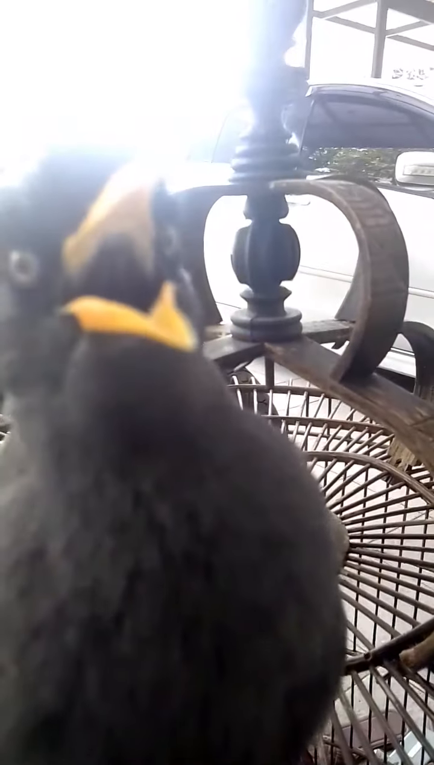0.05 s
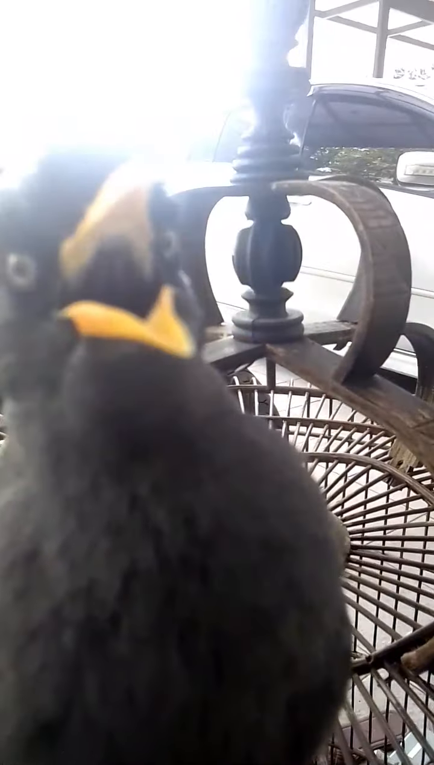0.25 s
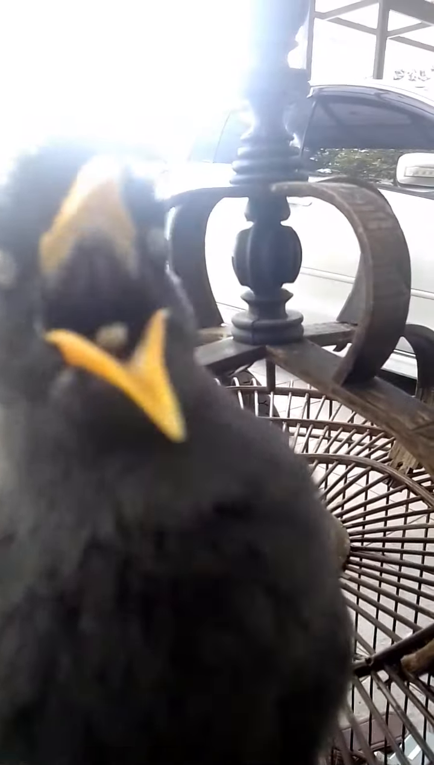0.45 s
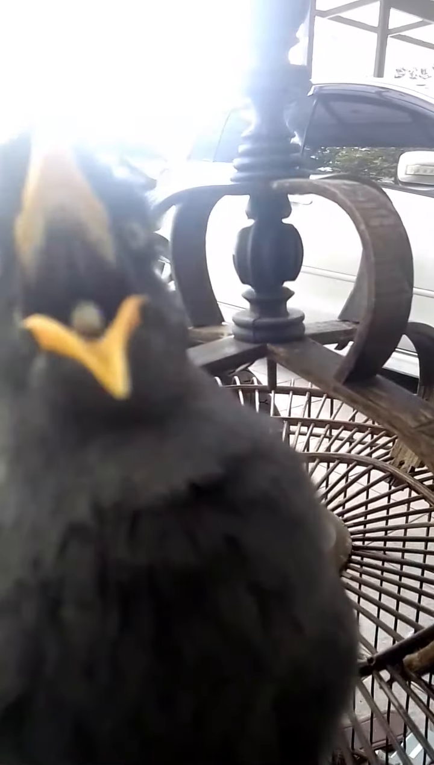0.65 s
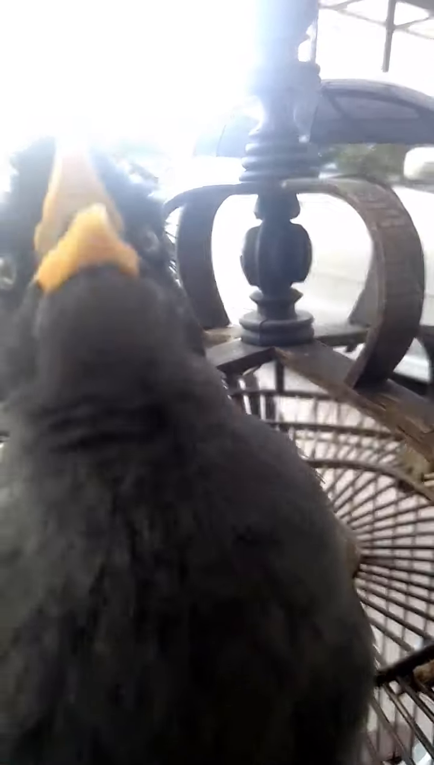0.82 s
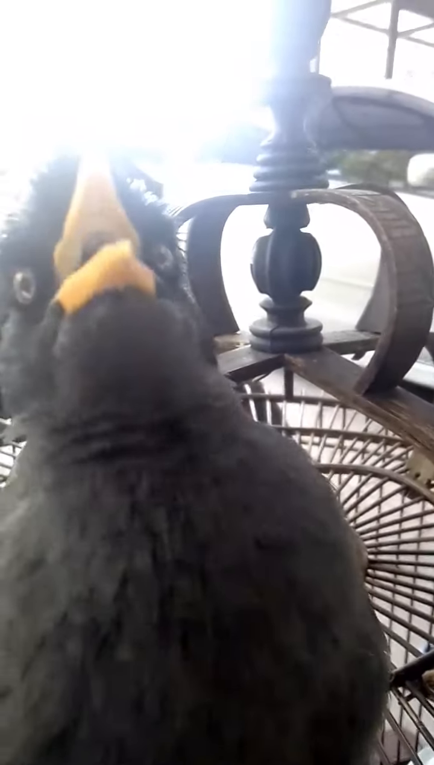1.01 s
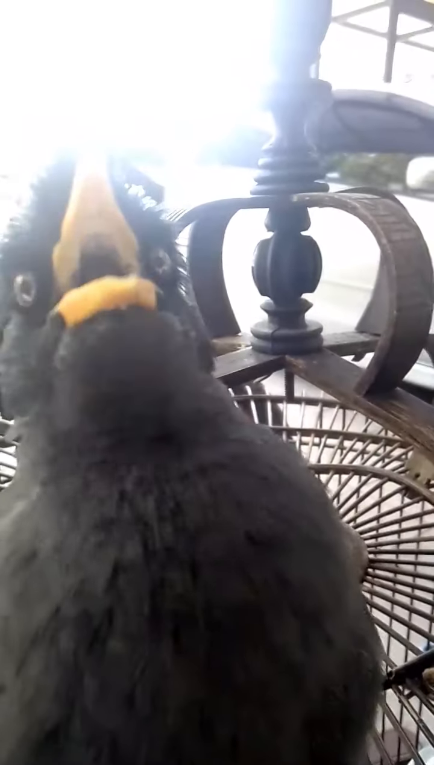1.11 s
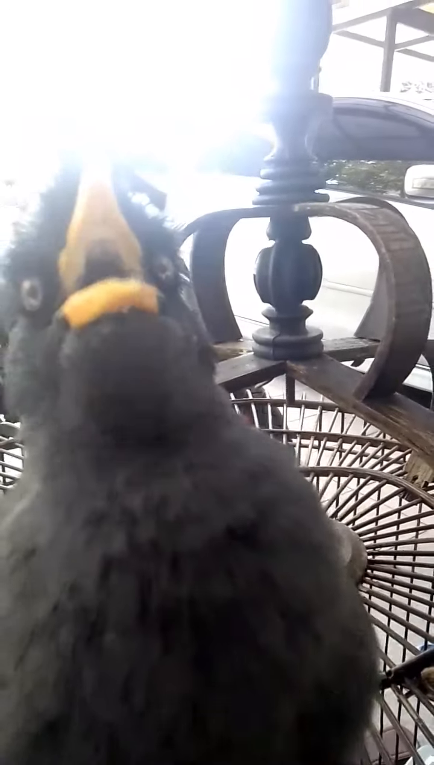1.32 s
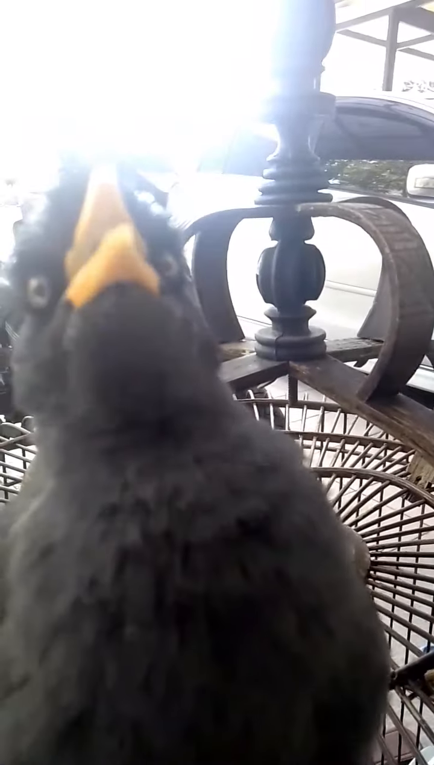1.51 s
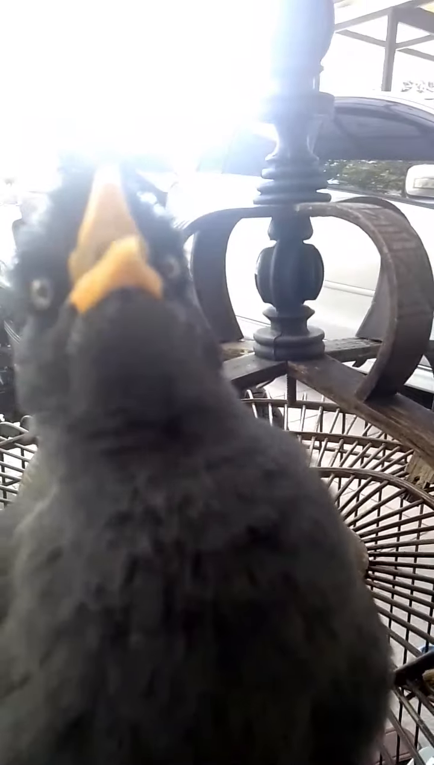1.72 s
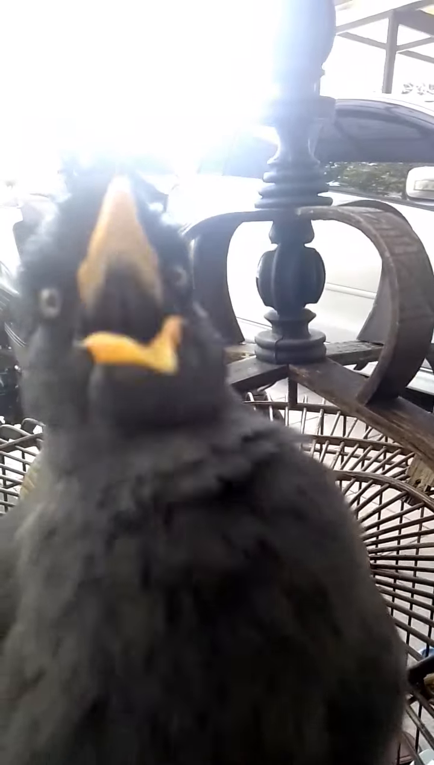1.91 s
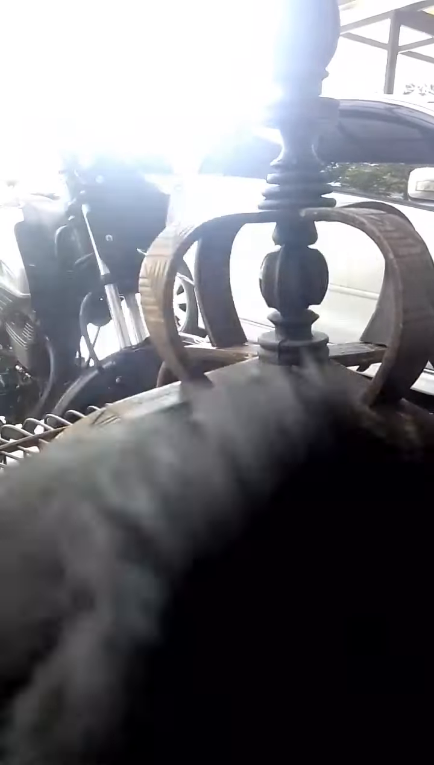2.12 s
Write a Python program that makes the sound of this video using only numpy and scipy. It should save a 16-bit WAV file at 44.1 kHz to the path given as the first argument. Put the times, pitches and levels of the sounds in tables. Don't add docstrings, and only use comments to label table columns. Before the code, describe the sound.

A myna bird calls close to a phone microphone in an open shelter. A soft twitter and two sharp chips come by 0.3 seconds, an arched whistle at 0.4, then a long swoop from 0.7 dips low and trills upward until 1.2. After a pause, harsh chucks sound at 1.4, 1.55 and softly 1.7, with a quick rising whistle. Three hard bill snaps follow around 2.0. Brief echo, faint outdoor hum.

```python
import sys
import numpy as np
from scipy import signal
from scipy.io import wavfile
from scipy.ndimage import uniform_filter1d, minimum_filter1d

SR = 44100
rng = np.random.default_rng(int(sys.argv[2]) if len(sys.argv) > 2 else 0)


def field_ratio(decibels):
    return 10 ** (np.asarray(decibels, dtype=float) / 20)


def dump_mix(stems):
    frames = np.atleast_2d(stems).T
    limited = np.clip(frames, -1, 1)
    pcm = np.round(limited * 32767).astype(np.int16)
    wavfile.write(sys.argv[1], SR, pcm)


N = 94815

# time_s, pitch_hz, level_db, second_partial_db
TWITTER = [
    (0, 4640, -42, -68),
    (.058, 3735, -31.5, -65),
    (.07, 4037, -33, -66.5),
    (.138, 3930, -42, -64),
    (.172, 5405, -30.5, -83.5),
]
CHIP_A = [
    (0.185, 5370, -45.5, -73),
    (0.199, 4370, -37.5, -61),
    (.206, 3550, -12, -50),
    (0.228, 3394, -20.5, -64.5),
    (0.237, 3408, -28.5, -57),
]
CHIP_B = [
    (.285, 5230, -39, -68.5),
    (.296, 4400, -40.5, -64),
    (.305, 3773, -10, -47),
    (0.322, 3482, -26, -70),
]
ARCH = [
    (0.43, 2840, -32.5, -34),
    (0.439, 3900, -11.5, -43),
    (.45, 3950, -1.5, -37.5),
    (0.466, 4370, -13.5, -46.5),
    (0.502, 4645, -22.5, -47.5),
    (0.518, 4788, -24, -47.5),
    (0.545, 4514, -18.5, -50.5),
    (0.566, 4210, -15, -46),
    (.589, 3935, -22, -54.5),
]
SWOOP = [
    (0.687, 3100, -39, -59),
    (.699, 3780, -10.5, -45),
    (.722, 4300, -12.5, -39),
    (.742, 4590, -13.5, -46),
    (.762, 4640, -17, -44),
    (0.791, 4350, -12, -43),
    (0.815, 3820, -6.5, -42),
    (0.829, 3500, -18, -48.5),
    (.85, 2930, -19, -36.5),
]
TROUGH = [(.872, 2560, -18, -39), (.895, 2220, -12, -36), (.925, 2070, -10, -34), (.966, 1980, -8, -33),
          (.98, 1860, -15, -35)]
TRILL = [(.994, 1950, -4, -27), (1.03, 2080, -10, -33), (1.06, 2560, -12, -34), (1.09, 2980, -12, -35),
         (1.12, 3290, -12, -35), (1.15, 3440, -10, -35), (1.17, 3330, -8, -35), (1.192, 3330, -9, -42)]
RISE = [
    (1.706, 1080, -16, -21),
    (1.726, 1500, -38, -30),
    (1.75, 1780, -32, -28),
    (1.761, 2030, -13, -43),
    (1.779, 2610, -21, -42),
    (1.79, 2570, -23, -42),
    (1.799, 2800, -15, -42),
    (1.83, 2892, -10, -42),
    (1.846, 2860, -22, -54),
]
NOTES = [TWITTER, CHIP_A, CHIP_B, ARCH, SWOOP + TROUGH + TRILL, RISE]
ATTACK_S, RELEASE_S = .003, .004
THIRD_DB, FOURTH_DB, RISE_UPPER_DB = -6, -17, -17
TROUGH_PARTIALS_DB = 6

# time_s, rate_hz, swing_hz
FLUTTER = [(.13, 125, 280), (.155, 125, 15), (.83, 125, 25), (.86, 125, 210), (.92, 120, 200),
           (.96, 75, 130), (1.0, 70, 10)]
FLUTTER_DB_PER_KHZ, WAVER_DB, WAVER_HZ = -2, 2, 23.2
RASP_DB, RASP_HZ, BREATH_DB = -27, 5000, -44
# time_s, level_db
RASP = [(0, -10), (.14, -5), (.2, -11), (.6, -18.5), (.69, 2.5), (.83, -15), (.92, -1), (1.0, 7.5),
        (1.14, 7), (1.19, -17), (1.72, 18.5), (1.8, -15)]
# time_s, level_db
BREATH = [(.4, -13.5), (.6, -7.5), (.69, 16.5), (.76, 20), (.83, 8.5), (.92, 1), (1.0, 0.5), (1.14, -8),
          (1.19, -12), (1.72, 2), (1.8, -2.5)]
# centre_s, length_s, depth_db
BREAKS = [(.933, .004, -18), (.95, .005, -16), (.9585, .004, -16), (.983, .007, -16), (1.012, .017, -32),
          (1.029, .005, -7), (1.043, .01, -9), (1.057, .006, -8), (1.104, .014, -5), (1.138, .01, -5)]
# pitch_hz, level_db
UPPER_TRACT = [
    (4500, -13.5),
    (5600, -3.5),
    (9000, -20),
    (12500, 3.5),
]
WINDPIPE_HZ = 1680

# crest_s, crest_hz, following_trough_hz
TRILL_TURNS = [(.995, 1960, 1380), (1.0275, 2420, 1750), (1.0575, 3300, 2140), (1.0885, 3800, 2450),
               (1.12, 4150, 2700), (1.152, 4150, 3070), (1.185, 3600, 3250), (1.215, 3600, 3250)]
TRILL_FALL_SHARE, TRILL_LEAP = .52, 2.0

# start_s, level_db
BLIPS = [
    (0.418, -18.5),
    (0.676, -18.5),
]
BLIP_S, BLIP_FROM_HZ, BLIP_TO_HZ, BLIP_SECOND_DB = 0.012, 1677, 2597, -2.5

# start_s, attack_s, hold_s, level_db, brightness_db
CHUCKS = [
    (1.388, 0.0025, 0.0077, -7.5, -1.5),
    (1.539, 0.0015, 0.012, -8.5, -3.5),
    (1.675, 0.021, 0.01, -19.5, -6),
    (1.695, 0.0074, 0.06, -32.5, -5),
]
CHUCK_RATE_HZ, CHUCK_SCATTER_DB, CHUCK_FALL_DB_S, CHUCK_AIR_DB = 3400, 1.5, 1504, -22.5
FIRST_SLAP_DB, FIRST_SLAP_S = 4, .003
# pitch_hz, width_hz, level_db
THROAT = [(1813, 60, -1), (2190, 172, -1), (3020, 160, -2), (3449, 130, 1), (3960, 80, 0), (5040, 536, -15)]
# pitch_hz, width_hz, level_db
CROP = [(654, 54, -33.5), (854, 204, -26), (1217, 334, -17), (1500, 166, -14)]
THROAT_STRETCH = [1.004, 0.971, 0.962, .93]

# start_s, level_db
SNAPS = [
    (1.9753, -1),
    (1.9984, 0),
    (2.0315, 2.5),
]
# pitch_hz, width_hz, level_db
BILL = [(2306, 440, -3.5), (3695, 165, 2.5), (5030, 620, -4), (7130, 530, -16), (8500, 150, -48.5),
        (9440, 148, -28), (11700, 220, -28.5)]
SNAP_DB, SNAP_EDGE_DB, TOUCH_DB, TOUCH_LEAD_S = -2.5, -5, -24, .0015

# start_s, length_s, level_db, centre_hz, width_hz
PUFFS = [(0.18, 0.017, -47, 2440, 2280), (0.42, 0.0058, -38, 4340, 5960), (0.649, 0.068, -36, 3190, 2330),
         (0.654, 0.042, -50, 8000, 8700), (1.151, 0.0027, -26.5, 11000, 2930),
         (1.173, 0.002, -19, 9800, 1500), (1.1774, 0.003, -34.5, 10170, 1500),
         (.676, 0.025, -29.5, 4480, 3930), (1.372, 0.0045, -39.5, 2030, 482),
         (1.395, 0.0006, -29.5, 8900, 12100)]
# start_s, level_db
POPS = [
    (1.394, -39),
    (1.975, -43),
    (1.996, -45),
    (2.03, -48),
]
POP_S = .004

# delay_s, level_db
ECHOES = [(.0007, -13), (.0024, -17), (.0054, -17), (.0118, -22), (.0205, -29)]
NEAR_DB, NEAR_T60_S = -14, 0.079
FAR_DB, FAR_T60_S, FAR_LOW_HZ, FAR_TOP_HZ = -18.5, 0.45, 1850, 5470

# pitch_hz, level_db
HUM = [(30, -5.5), (70, -21.5), (200, -5), (500, -7.5), (1100, -12), (2600, -16.5), (4300, -35.5),
       (14000, -27)]
HUM_DB, HUM_LINE_HZ, HUM_LINE_DB = -54.5, 876.5, -59
RUMBLE_HZ, RUMBLE_DB = 50, -77
MIC_LOW_HZ, MIC_TOP_HZ, TOP_HZ, CEILING = 40, 11900, 15900, 0.7


def unit(x):
    return x / np.sqrt(np.mean(x ** 2) + 1e-18)


def ring(x, hz, width):
    return signal.lfilter(*signal.iirpeak(hz, hz / max(width, 30.), fs=SR), x)


def noise():
    return rng.standard_normal(N)


def walk(rate):
    k = int(SR / rate)
    return unit(uniform_filter1d(uniform_filter1d(noise(), k), k))


def curve(table, t, axis=1):
    rows = np.array(table, float)
    return np.interp(t, rows[:, 0], rows[:, axis])


def whistles(t):
    rows = sorted(sum((list(note) for note in NOTES), []))
    gate = 0
    for note in NOTES:
        start, end = note[0][0], note[-1][0]
        gate = gate + np.interp(t, [start - ATTACK_S, start, end, end + RELEASE_S], [0, 1, 1, 0]) ** 2

    flutter_rate = curve(FLUTTER, t) * (1 + 0.043 * walk(49))
    swing = curve(FLUTTER, t, axis=2) * field_ratio(1.7 * walk(130))
    flutter = swing * np.sin(2 * np.pi * np.cumsum(flutter_rate) / SR)
    trill_hz, height = trill(t)
    trilling = (t > TRILL_TURNS[0][0]) & (t < TRILL_TURNS[-1][0])
    glide_hz = uniform_filter1d(curve(rows, t), size=260)
    hz = np.where(trilling, trill_hz, glide_hz) + flutter + WAVER_HZ * walk(150)
    phase = 2 * np.pi * np.cumsum(hz) / SR

    break_db = sum(db * np.exp(-(2 * (t - s) / span) ** 2) for s, span, db in BREAKS)
    first = field_ratio(curve(rows, t, axis=2) + break_db)
    second_db = curve(rows, t, axis=3) + 0.56 * walk(160)
    second = field_ratio(second_db - TROUGH_PARTIALS_DB * height * trilling)
    rise_db = RISE_UPPER_DB * (t > RISE[0][0] - ATTACK_S)

    def upper_gain(k):
        return np.clip((TOP_HZ - k * hz) / 2000, 0, 1) * field_ratio(curve(UPPER_TRACT, k * hz) + rise_db)

    rasp = field_ratio(RASP_DB + curve(RASP, t)) * walk(RASP_HZ)
    partials = np.sin(2 * phase)
    partials = partials + field_ratio(THIRD_DB) * upper_gain(3.07) * np.sin(3 * phase)
    partials = partials + field_ratio(FOURTH_DB) * upper_gain(4) * np.sin(4 * phase)
    tone = first * (1 + rasp) * np.sin(phase) + second * partials
    breath = field_ratio(BREATH_DB + curve(BREATH, t)) * first * unit(ring(noise(), 3600, 5500))
    waver = field_ratio(WAVER_DB * walk(110) + FLUTTER_DB_PER_KHZ * flutter / 1000)
    voice = gate * waver * (np.sqrt(2) * tone + breath)
    return signal.sosfilt(signal.butter(6, WINDPIPE_HZ, "high", fs=SR, output="sos"), voice)


def trill(t):
    s, crest, trough = np.array(TRILL_TURNS).T
    turn = np.interp(t, s, np.arange(len(s)))
    k = np.minimum(turn.astype(int), len(s) - 2)
    u = turn - k
    fall = np.clip(u / TRILL_FALL_SHARE, 0, 1)
    leap = np.clip((u - TRILL_FALL_SHARE) / (1 - TRILL_FALL_SHARE), 0, 1) ** TRILL_LEAP
    down = .5 + .5 * np.cos(np.pi * fall)
    up = .5 - .5 * np.cos(np.pi * leap)
    hz = trough[k] + (crest[k] - trough[k]) * down + (crest[k + 1] - trough[k]) * up
    return hz, 2 * (down + up) - 1


def blips(t):
    out = 0
    for s, db in BLIPS:
        u = np.clip((t - s) / BLIP_S, 0, 1)
        phase = 2 * np.pi * BLIP_S * (BLIP_FROM_HZ * u + (BLIP_TO_HZ - BLIP_FROM_HZ) * u ** 2 / 2)
        octave = np.sin(2 * phase) + 0.064 * np.sin(3 * phase)
        out = out + field_ratio(db) * np.sin(np.pi * u ** 1.12) * (np.sin(phase) + field_ratio(BLIP_SECOND_DB) * octave)
    return out


def chucks(t):
    out = 0
    for (s, attack, hold, db, air_db), stretch in zip(CHUCKS, THROAT_STRETCH):
        struck = rng.random(N) < CHUCK_RATE_HZ / SR
        slaps = struck * noise() * field_ratio(CHUCK_SCATTER_DB * walk(450))
        low = 0
        for hz, width, gain_db in list(THROAT) + list(CROP):
            once = ring(slaps, hz * stretch, 3.35 * width)
            low = low + field_ratio(gain_db) * ring(once, hz * stretch, 2.0 * width)
        air = unit(ring(slaps + 0.09 * noise(), 7500, 6200))
        after = np.clip(t - s - attack, 0, 1)
        punch_db = FIRST_SLAP_DB * np.exp(-after / FIRST_SLAP_S)
        fall_db = CHUCK_FALL_DB_S * np.clip(after - hold, 0, 1)
        shape = np.clip((t - s) / attack, 0, 1) ** 2 * field_ratio(punch_db - fall_db)
        out = out + field_ratio(db) * shape * (unit(low) + field_ratio(CHUCK_AIR_DB + air_db) * air)
    return out


def snaps():
    kick = np.eye(1, 900)[0]
    out = np.zeros(N)
    for s, db in SNAPS:
        detune = 1 + 0.054 * rng.standard_normal()
        body = 0
        for k, (hz, width, gain_db) in enumerate(BILL):
            body = body + (-1) ** k * field_ratio(gain_db) * ring(kick, hz * detune, width)
        body = body / abs(body).max() + field_ratio(SNAP_EDGE_DB) * ring(kick, 4200, 16000)
        i = int(s * SR)
        touch = i - int(TOUCH_LEAD_S * SR)
        out[i:i + 900] += field_ratio(db + SNAP_DB) * body
        out[touch:touch + 900] += field_ratio(db + TOUCH_DB) * body
    return out


def puffs(t):
    out = 0
    for s, span, db, hz, width in PUFFS:
        swell = np.sin(np.pi * np.clip((t - s) / span, 0, 1))
        out = out + field_ratio(db) * swell * unit(ring(ring(noise(), hz, width), hz, width))
    return out


def pops(t):
    return sum(field_ratio(db) * np.sin(np.pi * np.clip((t - s) / POP_S, 0, 1)) ** 2 for s, db in POPS)


def shelter(x):
    t = np.arange(int(.6 * SR)) / SR

    def tail(t60):
        echoes = rng.standard_normal(len(t)) * field_ratio(-60 * t / t60) * np.clip(t / 0.011, 0, 1)
        return unit(echoes) / np.sqrt(len(t))

    far = signal.lfilter(*signal.butter(1, [FAR_LOW_HZ, FAR_TOP_HZ], "band", fs=SR), tail(FAR_T60_S))
    reply = field_ratio(NEAR_DB) * tail(NEAR_T60_S) + field_ratio(FAR_DB) * far
    reply[0] += 1
    for s, db in ECHOES:
        reply[int(s * SR)] += field_ratio(db)
    return signal.fftconvolve(x, reply)[:N]


def hum(t):
    rows, wash = np.array(HUM), 0
    for hz in 35 * 2 ** np.arange(0, 9, .5):
        db = np.interp(np.log(hz), np.log(rows[:, 0]), rows[:, 1])
        db = db + 10 * np.log10(hz) + 0.5 * walk(24)
        wash = wash + field_ratio(db) * unit(ring(ring(noise(), hz, hz / 2), hz, hz / 2))
    machine = field_ratio(2.1 * walk(18)) * np.sin(2 * np.pi * HUM_LINE_HZ * t + walk(12))
    return field_ratio(HUM_DB) * unit(wash) + field_ratio(HUM_LINE_DB) * machine


def rumble():
    return field_ratio(RUMBLE_DB + 2.9 * walk(8.3)) * unit(ring(noise(), RUMBLE_HZ, 85))


def scene():
    t = np.arange(N) / SR
    bird = whistles(t) + blips(t) + chucks(t) + snaps() + puffs(t)
    return (shelter(bird) + pops(t) + hum(t) + rumble())[None]


def roll_off(x):
    return signal.sosfilt(signal.butter(12, 16510, fs=SR, output="sos"), x)


def record(dry):
    mic = signal.lfilter(*signal.butter(2, [MIC_LOW_HZ, MIC_TOP_HZ], "band", fs=SR), dry)
    peak = -minimum_filter1d(-abs(mic), size=221, axis=1)
    gain = uniform_filter1d(np.minimum(1, CEILING / (peak + 1e-9)), size=111, axis=1)
    cut = signal.sosfilt(signal.ellip(8, .2, 70, TOP_HZ, fs=SR, output="sos"), mic * gain)
    return roll_off(cut)


dry = scene()
out = record(dry)
dump_mix(out)
```